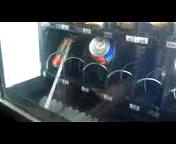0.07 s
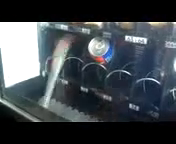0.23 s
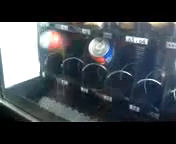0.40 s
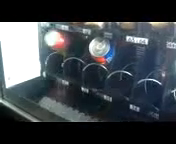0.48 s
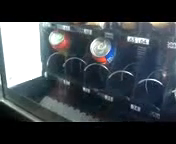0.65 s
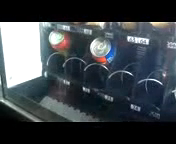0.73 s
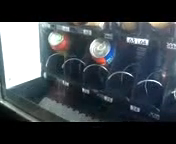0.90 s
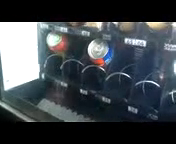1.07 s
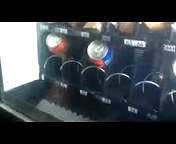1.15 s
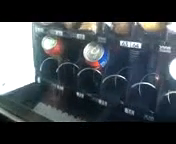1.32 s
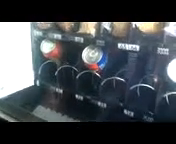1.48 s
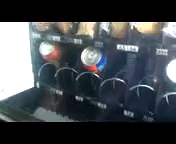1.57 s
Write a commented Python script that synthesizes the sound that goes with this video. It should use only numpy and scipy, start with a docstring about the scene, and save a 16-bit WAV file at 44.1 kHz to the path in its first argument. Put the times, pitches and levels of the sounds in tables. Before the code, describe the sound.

A drink can scrapes and bangs inside a vending machine, then clicks and rattles lightly.

```python
"""A can in a vending machine

A drink can is jostled: the cabinet thumps, the can scrapes along its wire coil, bangs against the
shelf and settles in small clicks and rattles. Impact and friction are trains of tiny contacts that
excite the modes of the thin can and reverberate in the steel cabinet. The cooler hums faintly below."""
import sys
import numpy as np
from scipy import signal
from scipy.fft import rfft, irfft
from scipy.io import wavfile
from scipy.ndimage import uniform_filter1d

SR = 44100
rng = np.random.default_rng(int(sys.argv[2]) if len(sys.argv) > 2 else 0)


def generate_wav(sig):
    """Save sig (samples, or channels by samples) to the path in sys.argv[1] as 16-bit PCM at SR."""
    pcm = np.round(np.clip(np.atleast_2d(sig).T, -1, 1) * 32767).astype(np.int16)
    wavfile.write(sys.argv[1], SR, pcm)


N = 72765
TOP_HZ = 7950  # upper band limit
BAND_GAIN = np.sqrt(2 * TOP_HZ / SR)  # offsets the gain of a unit-energy response confined to that band

# bright and dull spectra of metal contacts (frequency [Hz], relative level [dB])
TREBLE_SPECTRUM = [(1200, -44.5), (2500, -7.5), (3200, -3), (4500, 1), (6200, -1), (7200, 0), (8000, -2.5)]
BODY_SPECTRUM = [(100, -12.5), (250, 4.5), (420, -0.5), (900, 3), (1500, 1.5), (2100, -0.5), (3200, -8)]


def undb(db):
    """Amplitude ratio of a level in decibels."""
    return 10 ** (np.asarray(db) / 20)


def rms(x):
    """Root-mean-square amplitude."""
    return np.sqrt(np.mean(x ** 2))


def unit(x):
    """Normalisation to an rms of 1."""
    return x / rms(x)


def since(start):
    """Seconds elapsed since an onset, zero before it."""
    return np.maximum(np.arange(N) / SR - start, 0)


def envelope(points):
    """Amplitude through (time [s], level [dB]) points, silent outside them."""
    times, levels = np.array(points).T
    return undb(np.interp(since(0), times, levels, left=-200, right=-200))


def damping(t, t60):
    """Exponential decay by 60 dB in t60 seconds."""
    return np.exp(-np.log(1000) * t / t60)


def convolve(x, response):
    """Linear filtering by an impulse response scaled to unit energy."""
    return signal.fftconvolve(x, response / np.sqrt(np.sum(response ** 2)))[:N]


def colour(x, spectrum):
    """Minimum-phase filtering by a spectral envelope that rolls off above the band limit."""
    hz, db = np.array(spectrum).T
    f = np.maximum(np.fft.rfftfreq(8192, 1 / SR), 1)
    gain = undb(np.interp(np.log(f), np.log(hz), db))
    gain /= np.sqrt(1 + (f / (TOP_HZ + 800)) ** 24)
    cepstrum = irfft(np.log(gain))
    causal_fold = 1 + np.sign(len(cepstrum) / 2 - np.arange(len(cepstrum)))
    return convolve(x, irfft(np.exp(rfft(cepstrum * causal_fold))))


def resonances(x, bands, flare_db=4, flares_per_s=70):
    """Forced vibration: two-stage resonances flare at random, as when the point of contact moves."""
    total = 0
    for hz, width, db in bands:
        flare = np.interp(since(0) * flares_per_s, np.arange(N), rng.standard_normal(N))
        drive = x * undb(flare_db * flare)
        b, a = signal.iirpeak(hz, hz / width, fs=SR)
        first_stage = signal.lfilter(b, a, drive + 1e-18)
        total += undb(db) * unit(signal.lfilter(b, a, first_stage + 1e-18))
    return total


def ring(modes, t):
    """Free vibration of a struck object: a sum of damped sinusoids."""
    return sum(undb(db) * damping(t, t60) * np.sin(2 * np.pi * hz * t) for hz, db, t60 in modes)


def contacts(per_s=3000, scatter_db=2.5):
    """Shot noise of uneven metal micro-impacts, levelled over 5 ms as under a steady force."""
    hits = rng.random(N) < per_s / SR
    impulses = hits * rng.choice([-1, 1], N) * undb(scatter_db * rng.standard_normal(N))
    local_power = np.abs(uniform_filter1d(impulses ** 2, size=220))
    return impulses / np.sqrt(local_power + 1e-9)


def background(waver_db=3, room_db=-50.5):
    """The cooler's hum, tones under slow amplitude modulation, over low broadband room noise."""
    # tones of the cooler (frequency [Hz], level [dB])
    hum_tones = [(99, -59.5), (197, -64.5), (243, -62.5)]
    # room noise (frequency [Hz], relative level [dB])
    room_spectrum = [(25, -1.5), (60, -5), (104, -12), (308, -14), (411, -21), (1340, -25), (2830, -32),
                     (8000, -40.5)]
    t = since(0)
    hum = 0
    for hz, db in hum_tones:
        waver = np.interp(t, np.linspace(0, N / SR, 16), rng.standard_normal(16))
        hum += undb(db + waver_db * waver) * np.sqrt(2) * np.sin(2 * np.pi * (hz * t + rng.random()))
    return hum + undb(room_db) * unit(colour(rng.standard_normal(N), room_spectrum))


def cabinet_reverb(x, build_s=0.0026):
    """Reverberation: dense reflections between steel walls and glass, the lows decaying slowest."""
    # short tail and long boom (frequency [Hz], relative level [dB])
    tail_spectrum = [(60, 2.5), (200, -1.5), (500, 7.5), (1200, 4.5), (2300, 7), (4000, 1.5), (8000, -1.5)]
    boom_spectrum = [(60, -8.5), (120, 3.5), (190, -1.5), (300, -6.5), (900, -20)]
    t = since(0)
    build = 1 - np.exp(-t / build_s)
    tail = colour(rng.standard_normal(N), tail_spectrum) * damping(t, t60=0.35) * build
    boom = colour(rng.standard_normal(N), boom_spectrum) * damping(t, t60=1.6) * build
    return (undb(-6.5) * convolve(x, tail) + undb(-14.5) * convolve(x, boom)) * BAND_GAIN


def panel_thumps(rise_s=0.0047):
    """Soft blows excite the low modes of the cabinet panels."""
    # blows on the cabinet (time [s], level [dB])
    blows = [(0.1889, -34), (0.234, -14), (0.2551, -24.5)]
    # panel modes (frequency [Hz], level [dB], T60 [s])
    panel_modes = [(84, -34, 0.069), (193, 0.5, 0.096), (225.6, -10.5, 0.093), (359, -8, 0.067)]
    thumps = 0
    for start, db in blows:
        t = since(start)
        thumps += undb(db) * ring(panel_modes, t) * (1 - np.exp(-t / rise_s))
    return thumps


def shelf_lurch(start_s=0.268, rise_s=0.013):
    """The shelf lurches once under the can and swings as a damped oscillator."""
    # shelf mode (frequency [Hz], level [dB], T60 [s])
    shelf_mode = [(74, -26.5, 0.275)]
    t = since(start_s)
    return ring(shelf_mode, t) * (1 - np.exp(-t / rise_s))


def can_ring(x):
    """Modal response of the can's thin wall to the contacts."""
    # wall modes (frequency [Hz], relative level [dB], T60 [s])
    can_modes = [(1410, -8, .055), (3100, -7, 0.027), (3714, 2, 0.053), (4200, -1, 0.039),
                 (5170, -2.5, 0.027), (6280, 0.5, 0.065), (6840, 1, 0.037)]
    return undb(-10.5) * convolve(x, ring(can_modes, since(0))) * BAND_GAIN


def slide():
    """Light sliding friction hisses in two resonances at the end."""
    # strength of the rub (time [s], level [dB])
    rub_levels = [(1.53, -56), (1.597, -52), (1.607, -45.5), (1.65, -43)]
    # resonances (frequency [Hz], stage bandwidth [Hz], level [dB])
    hiss_bands = [(5120, 1800, -0.5), (6860, 910, -4.5)]
    return envelope(rub_levels) * resonances(contacts(), hiss_bands)


def scrape():
    """Friction on the coil makes broadband noise, drives fitful squeals and shakes the shelf."""
    # strength of the rub (time [s], level [dB])
    rub_levels = [(.235, -61.5), (.258, -33.5), (.278, -24), (.318, -23), (.342, -27), (.36, -27.5),
                  (.385, -32), (.405, -40.5), (.47, -39), (.55, -71)]
    # resonances of the rubbing can and the shelf (frequency [Hz], stage bandwidth [Hz], level [dB])
    squeal_bands = [(3243, 250, -11), (3810, 550, -13), (5220, 450, -15), (6160, 230, -14.5),
                    (7060, 530, -11)]
    shelf_bands = [(193.5, 110, -18)]
    force = envelope(rub_levels)
    ringing = rms(force) * resonances(force * contacts(), squeal_bands + shelf_bands)
    hiss = undb(-0.5) * colour(force * contacts(), TREBLE_SPECTRUM)
    body = undb(-7.5) * colour(force * contacts(), BODY_SPECTRUM)
    return hiss + body + ringing


def knocks(note_hold=1.3, relative_linewidth=0.0223):
    """Impact excitation: each knock gives a chatter of contacts and three notes set by the spot hit. The event
    at 0.308 s is not a knock but a brief squeal of three chirps during the scrape."""
    # knocks of the can, and at 0.308 s a short squeal amid the scrape (time [s], treble level [dB], body level
    # [dB], note level [dB], rise [s], chatter decay constant [s], three note frequencies [Hz])
    impacts = [(0.107, -79.5, -53.5, -67, 0.0065, 0.011, 1330, 3170, 5020),
               (0.184, -58, -51, -56, 0.017, 0.14, 918, 1426, 3200),
               (0.216, -38, -37.5, -38.5, 0.0077, 0.085, 3870, 3133, 6050),
               (0.2725, -32, -32, -34, 0.0012, 0.0048, 6230, 7140, 5400),
               (.308, -41, -36, -23, 0.0037, 0.0057, 6130, 3310, 5260),
               (0.358, -18, -34, -23.5, 0.0009, 0.0096, 1470, 4323, 3120),
               (0.48, -57, -39.5, -39, 0.0026, 0.016, 914, 1245, 3700),
               (0.513, -42, -44.5, -48, 0.0011, 0.023, 6270, 3650, 1400),
               (0.574, -49.5, -50, -59, .002, 0.026, 4720, 3240, 1296),
               (0.6808, -35, -39.5, -44, 0.0059, 0.0071, 3836, 1446, 5030),
               (.691, -31.5, -37.5, -37, 0.0023, 0.0093, 3608, 1353, 7020),
               (0.778, -50, -72, -53, 0.0025, 0.035, 6460, 3520, 7640),
               (0.801, -47, -45, -44, 0.011, 0.01, 1322, 4460, 6300),
               (.848, -45, -51, -45, .001, 0.0075, 3820, 1760, 4750),
               (0.8962, -29, -35, -32, 0.0018, 0.011, 5150, 7600, 4230),
               (.928, -57, -53, -46, 0.0026, 0.0095, 960, 3690, 4400),
               (1.064, -46, -58, -42, 0.023, 0.0066, 4610, 5390, 3060),
               (1.161, -53.5, -55.5, -51, 0.0016, 0.038, 6240, 4520, 3890),
               (1.2046, -31, -39, -34, 0.0066, 0.0042, 4630, 1354, 3180),
               (1.2484, -31, -40.5, -38, 0.0012, 0.0059, 4050, 3310, 5190),
               (1.4644, -49.5, -43, -45, 0.0021, 0.015, 4776, 3510, 5720),
               (1.486, -47, -44, -47, 0.0012, 0.024, 1149, 3386, 4790)]
    # first, second and third note (relative level [dB])
    note_levels = (-2, -4.5, -8)
    treble, body, notes = 0, 0, 0
    for start, treble_db, body_db, note_db, rise, decay, *frequencies in impacts:
        t = since(start)
        attack = np.minimum(t / rise, 1)
        release = np.exp(-np.maximum(t - rise, 0) / decay)
        force = attack * release
        treble += undb(treble_db) * rms(force) * unit(force * contacts())
        body += undb(body_db) * rms(force) * unit(force * contacts())
        swing = attack * release ** (1 / note_hold)  # the notes outlast the chatter
        for hz, db in zip(frequencies, note_levels):
            phase_step = np.sqrt(2 * np.pi * relative_linewidth * hz / SR)
            jitter = phase_step * np.cumsum(rng.standard_normal(N))  # phase diffusion roughens the note
            notes += undb(note_db + db) * swing * np.sqrt(2) * np.sin(2 * np.pi * hz * t + jitter)
    return colour(treble, TREBLE_SPECTRUM) + colour(body, BODY_SPECTRUM), notes


def scene():
    """Superposition of the can's direct sound, its reverberation, the low thumps and the background."""
    chatter, notes = knocks()
    contact_noise = chatter + scrape() + slide()
    can = contact_noise + can_ring(contact_noise)
    reverb = cabinet_reverb(can + undb(-3.5) * notes)
    return (can + notes + reverb + panel_thumps() + shelf_lurch() + background())[None]


def record(dry):
    """Band limiting by a steep elliptic low-pass filter."""
    return signal.sosfilt(signal.ellip(16, .1, 80, TOP_HZ, fs=SR, output="sos"), dry)


dry = scene()
out = record(dry)
generate_wav(out)
```